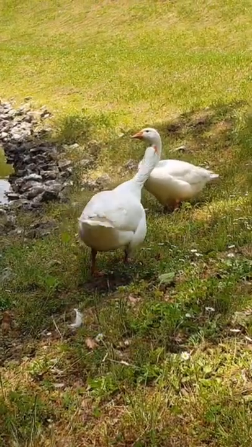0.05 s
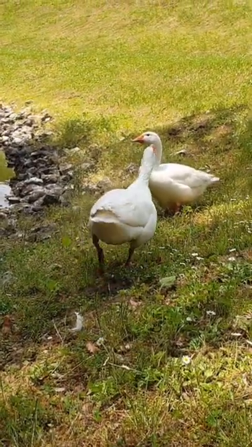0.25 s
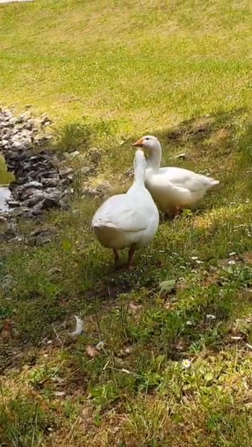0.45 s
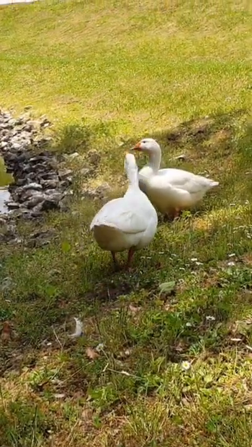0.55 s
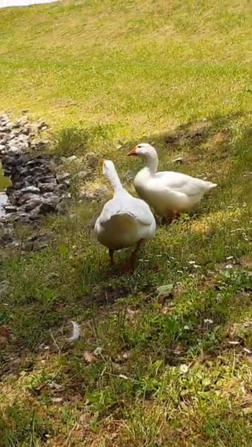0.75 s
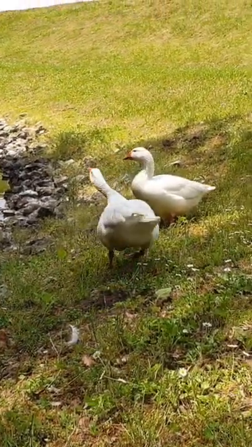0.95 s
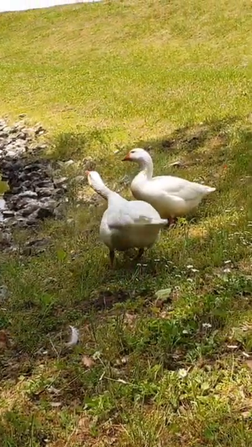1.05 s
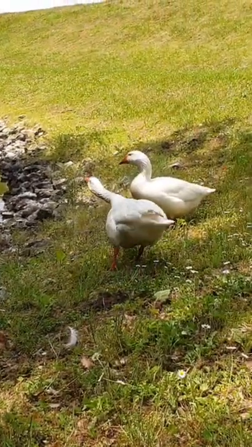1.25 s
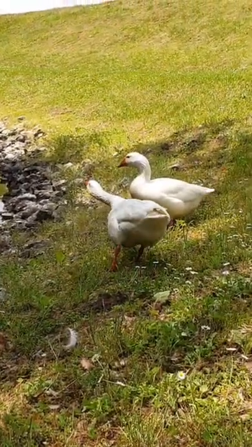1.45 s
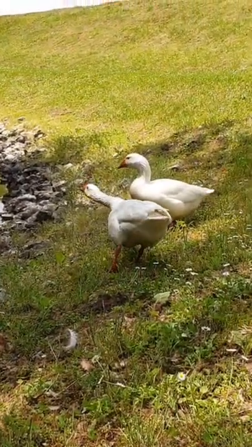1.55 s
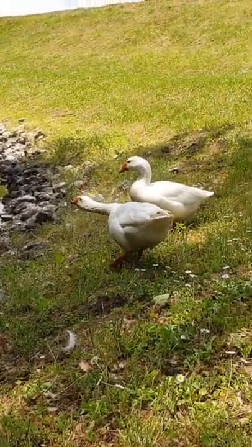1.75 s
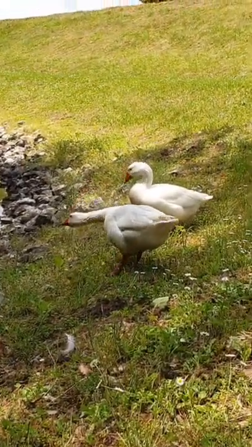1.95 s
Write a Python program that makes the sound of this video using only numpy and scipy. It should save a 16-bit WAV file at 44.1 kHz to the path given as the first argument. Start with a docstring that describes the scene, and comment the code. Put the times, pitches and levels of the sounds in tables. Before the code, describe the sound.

Three long, raspy goose honks and two quiet grunts outdoors over faint wind.

```python
"""A grassy bank, a goose a few metres from a stereo microphone: three long rasping honks, two soft grunts.
Its voice box beats about 160 times a second; each beat sends a short rising squeal up the neck,
with a puff of air. The bank throws back a thin bright tail, at first from a honk that has just ended.
A light wind rumbles on the microphone over a faint distant hiss."""
import sys
import numpy as np
from scipy import signal
from scipy.fft import rfft, irfft
from scipy.io import wavfile
from scipy.ndimage import uniform_filter1d, map_coordinates

SR = 44100
rng = np.random.default_rng(int(sys.argv[2]) if len(sys.argv) > 2 else 0)


def file_out(sig):
    """Save sig as 16-bit WAV at sys.argv[1]."""
    # one column per channel
    cols = np.atleast_2d(sig).T
    # limit, then scale
    lim = np.clip(cols, -1, 1)
    pcm = np.round(lim * 32767).astype(np.int16)
    wavfile.write(sys.argv[1], SR, pcm)


N = 88200

# One list per call. Each row: time in seconds, squeal and beat tone levels in dB, squeal pitch in Hz,
# its rise from 0 to 1, then overtones, hiss and windpipe in dB against the squeal.
CALLS = [
    [(0.208, -36, -57, 1178, 0, 4.5, -9, -13), (0.226, -17.5, -34.5, 1366, 0.5, -3, -19, -29),
     (0.242, -15, -34, 1465, 0.21, -11.5, -35, -26.5), (0.29, -24, -34.5, 1110, 0.68, -1, -14.5, -13.5),
     (0.328, -23, -39, 1200, 0.68, -3.5, -25, -17), (0.352, -15.5, -32, 1490, 0.22, -9, -27, -27),
     (0.482, -17, -33, 1355, 0.3, -7.5, -30, -23), (0.497, -15.5, -31.5, 1480, 0.3, -8, -27.5, -21.5),
     (0.568, -15, -33.5, 1387, 0.17, -9, -33.5, -22.5), (0.584, -62, -43, 1290, 0, -16, -35, 8)],
    [(0.806, -40, -55, 1010, 0.56, -9.5, -50, -10.5), (0.839, -30.5, -45, 950, 0.7, -20, -48, -11.5),
     (0.853, -51, -57, 1010, 0.67, -16, -43, 13)],
    [(0.861, -44, -52, 1190, 1, -18, -14, -6), (0.877, -19, -35, 1333, 0.31, -7.5, -26.5, -20),
     (0.953, -21, -37, 1333, 0.36, -11.5, -30, -24.5), (0.995, -17, -29.5, 1485, 0.39, -10, -25.5, -17),
     (1.043, -16.5, -30.5, 1478, 0.31, -11.5, -29, -22.5),
     (1.157, -16.5, -32.5, 1534, 0.57, -10.5, -19.5, -20.5),
     (1.191, -15, -28.5, 1580, 0.44, -9.5, -27.5, -20), (1.249, -17, -33.5, 1437, 0.34, -11, -35, -23),
     (1.268, -27, -51.5, 1450, 0.17, 2, -16.5, 0)],
    [(1.298, -44, -44, 1070, 1, 11.5, -3, -4), (1.32, -28.5, -46, 1090, 0, -14.5, -35, -9),
     (1.35, -31, -40.5, 1030, 0.73, -5, -26, -6), (1.386, -39, -40, 1120, 0, -7, -38, -5),
     (1.396, -60, -67, 1030, 0.7, -6, -18, 18)],
    [(1.442, -62, -67, 1330, 0.6, -15, -38, -3), (1.45, -28, -50, 1260, 0.38, 1, -23, -14),
     (1.472, -17, -30.5, 1485, 0.34, -12, -30.5, -19.5), (1.522, -23, -49, 1297, 0.22, -10.5, -28, -10.5),
     (1.545, -32, -29.5, 1236, 0.66, 1.5, -4.5, -11.5), (1.586, -19, -40.5, 1320, 0.23, -7, -17, -17),
     (1.662, -21, -32, 1538, 0.3, -10, -25.5, -13.5), (1.696, -16.5, -36, 1292, 0.18, -6, -40, -18),
     (1.708, -31.5, -39, 1214, 0, -1, -30, -14), (1.72, -53, -65, 1190, 1, 15, -26, 8)],
]
# The rasp. Each row: time in seconds, roughness and strong-weak alternation of beats, both 0 to 1.
RASP = [(.2, .6, 0), (.25, .45, .2), (.36, .13, .4), (.46, .2, .35), (.5, .08, 0), (.58, .12, 0),
        (.8, .15, 0), (.86, .3, 0), (.95, .55, .2), (1.0, .3, .1), (1.06, .17, .08), (1.27, .2, .05),
        (1.4, .12, 0), (1.44, .55, 0), (1.5, .45, .2), (1.55, .9, 0), (1.58, .1, 0), (1.66, .1, 0),
        (1.72, .35, .2)]
# The voice box. Each row: time in seconds, beat rate in Hz.
BEAT_RATE = [(.2, 160), (.25, 157), (.5, 158.7), (.555, 158), (.584, 148), (.8, 140), (.855, 141),
             (.87, 158), (1.05, 158.2), (1.12, 159.5), (1.2, 162.7), (1.25, 162), (1.27, 156), (1.3, 154),
             (1.39, 146), (1.44, 160), (1.56, 155), (1.59, 159), (1.68, 162.5), (1.698, 161), (1.72, 151)]
# Resonances of the bird and its breath. Each row: centre in Hz, width in Hz, relative level in dB.
NECK_MODES = [(978, 175, 16.5), (1329, 137, 6.5), (1736, 200, 6.5)]
THROAT_MODES = [(2065, 214, 3), (2450, 170, 5), (2827, 143, 8), (2990, 180, 2.5), (3405, 64, 8),
                (3900, 720, 0.5), (4660, 1550, -2.5)]
WINDPIPE_MODES = [(554, 92, -4), (273, 67, -9), (663.5, 390, -10.5)]
HISS_BANDS = [(6600, 2060, -3), (9340, 1700, -16)]
SHEEN_BANDS = [(10400, 4800, 1.7), (13050, 1200, -2.2)]
# Ticks at the edges of honks. Each row: time in seconds, level in dB.
TICKS = [(0.209, -3.5), (0.2165, -27), (.221, -29), (0.865, -7), (1.262, -17.5), (1.445, -11)]
# Brief tones in the voice: short whistles, and the second grunt's fifth harmonic.
# Each row: start and length in seconds, pitch and glide in Hz, level between beats in dB.
BRIEF_TONES = [(0.355, 0.1, 3097, -13, -29.5), (0.864, 0.15, 526.4, -20, -39.5),
               (0.968, 0.056, 505, 35, -33), (1.084, 0.034, 521, -24, -35), (1.089, 0.13, 2750, -8, -31),
               (1.124, 0.037, 4440, -8, -28.5), (1.141, 0.091, 740, -11, -35),
               (1.193, 0.071, 3007, -51, -28.5), (1.306, 0.075, 766, -36, -36.5)]
# Distant hiss. Each row: frequency in Hz, relative level in dB.
AIR_SPECTRUM = [(30, -81), (116, -9), (176, -13), (1140, -18), (1410, -11), (1920, -14.5),
                (8690, -32), (13200, -36)]
# Wind on the microphone. Each row: time in seconds, level before gusts in dB.
WIND_LEVEL = [(0.0, -73.5), (0.61, -54), (0.65, -64), (0.919, -74), (1.05, -74), (1.11, -55.5), (2.0, -72)]
# Colour of the bank's echo. Each row: band centre in Hz, weight in dB.
ECHO_BANDS = [(750, -15), (1700, -27), (3000, -7), (7000, -2), (12000, 2)]
# Its decay. Each row: band centre in Hz, seconds to fall 60 dB.
ECHO_DECAY = [(750, 0.36), (1700, 0.4), (3000, 0.49), (7000, 0.42), (12000, 0.33)]
# Balance of the microphone's two ports. Each row: frequency in Hz, left minus right in dB.
PORT_BALANCE = [(110, 0.5), (200, -1.5), (700, 0.5), (1290, 1.5), (2380, 4), (4400, -7), (8120, 7),
                (15000, 1.5)]
# Phase between them. Each row: frequency in Hz, lead of the left port in radians.
PORT_LEAD = [(0, 0), (700, .35), (1290, .8), (1550, 1.6), (1810, .7), (2070, 4.9), (3100, 6.9), (7400, 10),
             (15000, 12)]


def undb(db):
    return 10 ** (np.asarray(db) / 20)


def unit(x):
    return x / np.sqrt(np.mean(x ** 2))


def band(x, hz, width):
    """A resonance applied twice."""
    b, a = signal.iirpeak(hz, hz / width, fs=SR)
    return signal.lfilter(b, a, signal.lfilter(b, a, x))


def cut(x, hz, kind):
    return signal.sosfilt(signal.butter(4, hz, kind, fs=SR, output="sos"), x)


def drift(rate_hz):
    """A smooth random wander, RMS 1."""
    span = int(SR / rate_hz)
    return unit(uniform_filter1d(uniform_filter1d(rng.standard_normal(N), span), span))


def resonate(x, modes, wander_db=2.0):
    """Sum of resonances, each swelling and fading on its own; RMS 1."""
    return unit(sum(undb(db + wander_db * drift(55)) * band(x, hz, width) for hz, width, db in modes))


def colour(x, gain):
    """Multiply the spectrum by gain(Hz)."""
    n = x.shape[-1]
    hz = np.maximum(np.arange(n // 2 + 1) * SR / n, 1)
    return irfft(rfft(x) * gain(hz), n)


def curve(table, at):
    return np.interp(at, *np.array(table).T)


def log_curve(table, hz):
    points_hz, values = np.array(table).T
    return np.interp(np.log(hz), np.log(points_hz), values)


def distant_air(level_db=-60):
    """Faint steady hiss from far off, unrelated left and right."""
    hiss = colour(rng.standard_normal((2, N)), lambda hz: undb(log_curve(AIR_SPECTRUM, hz)))
    return unit(hiss) * undb(level_db)


def wind(t, shared=0.45, gust_db=2.5):
    """Gusts rumble on the microphone, partly alike at both ports."""
    noise = rng.standard_normal((3, N))
    rumble = band(shared * noise[0] + (1 - shared) * noise[1:], hz=50, width=25)
    return unit(rumble) * undb(curve(WIND_LEVEL, t) + gust_db * drift(33))


def bank_echo(voice, earlier_s=0.57, earlier_db=-8, waver_s=0.000596, onset_s=0.0014):
    """The bank scatters the voice back as diffuse echoes, each band fading at its own rate."""
    shift = int(earlier_s * SR)
    # The first honk also sounds just before the start; only its tail is heard.
    calls = np.concatenate([undb(earlier_db) * voice[:shift], voice])
    # Moving air makes the echoes arrive unevenly.
    waver = waver_s * SR * np.concatenate([drift(40)[:shift], drift(40)])
    calls = map_coordinates(calls, [np.arange(len(calls)) + waver], order=3)
    age = np.arange(SR) / SR
    response = 0
    for (hz, db), (_, t60) in zip(ECHO_BANDS, ECHO_DECAY):
        scatter = band(rng.standard_normal((2, SR)), hz, hz)
        response += undb(db) * scatter * np.exp(-np.log(1000) * age / t60) / np.sqrt(t60 * hz)
    response *= np.clip(age / onset_s, 0, 1)
    return signal.fftconvolve(calls[None], response, axes=1)[:, shift:shift + N]


def goose(t, neck_db=-4.5, rumble_db=-15.5, puff_depth=0.7):
    """Each beat of the voice box sends a rising squeal up the neck, with a knock and a puff of air."""
    times, *columns = np.array(sorted(row for call in CALLS for row in call)).T
    db, tone_db, squeal_hz, rise, over_db, hiss_db, pipe_db = (np.interp(t, times, c) for c in columns)
    calling = sum((t > call[0][0]) & (t < call[-1][0]) for call in CALLS) > 0
    calling = uniform_filter1d(calling.astype(float), size=60)
    rasp_times, *rasp = np.array(RASP).T
    rough, alternation = (np.interp(t, rasp_times, c) for c in rasp)

    beat_hz = curve(BEAT_RATE, t)
    cycles = np.cumsum(beat_hz) / SR
    beat, within = cycles.astype(int), cycles % 1
    seesaw = alternation * (-1) ** beat
    # Roughness makes every beat a little different.
    time_jitter, size_jitter, pitch_jitter, phase_jitter = rough * rng.standard_normal((N // 100, 4))[beat].T
    from_peak = within - 0.45 - 0.061 * time_jitter  # in beats
    width = 0.19 * (1.6 - rise + 0.5 * rough)  # a squeal that rises less lasts longer
    pulse = np.exp(-0.5 * (from_peak / width) ** 2) * np.sin(np.pi * within) ** 0.5
    strength = undb(4 * size_jitter)
    beat_start = np.searchsorted(cycles, beat)  # each squeal takes its base pitch as the beat begins
    turns_per_beat = (squeal_hz / beat_hz)[beat_start] * (1 + 0.08 * pitch_jitter)
    turns = turns_per_beat * (from_peak + rise * from_peak ** 2)
    phase = 2 * np.pi * turns + 1.6 * phase_jitter + np.pi / 2 * seesaw

    bare = unit(cut(pulse * strength * np.cos(phase), 870, "high"))
    squeal = unit(bare + undb(neck_db) * resonate(bare, NECK_MODES))
    puff = 1 - puff_depth + puff_depth * pulse * strength
    buzz = pulse ** 2 * strength * (np.cos(2 * phase) + 1.2 * np.cos(3 * phase))
    overtones = undb(over_db) * throat(squeal, buzz, np.sqrt(rough) * puff)
    knocks = undb(pipe_db) * windpipe(beat, strength * (1 + 2 * seesaw), rough)
    hiss = undb(hiss_db) * breath(puff, calling)
    rumble = unit(band(rng.standard_normal(N), hz=160, width=130))
    beat_tone = np.sqrt(2) * np.sin(2 * np.pi * cycles) + undb(rumble_db) * rumble
    honks = undb(db) * (squeal + overtones + knocks + hiss) + undb(tone_db) * beat_tone
    return calling * (honks + ticks(t) + brief_tones(t, pulse))


def throat(squeal, buzz, rough_puff, noise_db=2, buzz_db=-7):
    """The clipped squeal and rough air ring the throat; the squeal's own overtones add a crisp buzz."""
    clipped = np.tanh(3 * squeal)
    noise = undb(noise_db) * rough_puff * rng.standard_normal(N)
    ringing = resonate(unit(clipped + clipped ** 2) + noise, THROAT_MODES)
    crisp = unit(band(buzz, hz=3800, width=3800))
    return cut(unit(ringing + undb(buzz_db) * crisp), 9000, "low")


def windpipe(beat, strength, rough):
    """Each beat knocks on the windpipe's low resonances; a rough voice adds noise."""
    knocks = np.diff(beat, prepend=0) * strength
    return resonate(unit(knocks) + (0.2 + 2 * rough) * rng.standard_normal(N), WINDPIPE_MODES)


def breath(puff, calling, scatter_db=-2, sheen_db=-4.5, sheen_rise_s=0.18):
    """Puffs of air hiss, part reaching each port on its own; the top of the hiss comes in late."""
    noise = rng.standard_normal((3, N))
    air = puff * (noise[0] + undb(scatter_db) * noise[1:])
    step = 1 / (sheen_rise_s * SR)
    swell = signal.lfilter([step], [1, step - 1], calling)
    hiss = cut(resonate(air, HISS_BANDS), 9000, "low")
    return hiss + undb(sheen_db) * swell ** 2 * resonate(air, SHEEN_BANDS)


def ticks(t, hz=3140, decay_s=0.00072):
    """Bright ticks as a honk begins or breaks off."""
    out = 0
    for start, db in TICKS:
        age = t - start
        envelope = np.clip(age / decay_s, 0, 1) * np.exp(-np.abs(age) / decay_s)
        out += undb(db) * envelope * np.sin(2 * np.pi * hz * age)
    return out


def brief_tones(t, pulse, wobble=0.00797):
    """Short whistles and the second grunt's fifth harmonic, unsteady and pulsing with the beat."""
    out = 0
    for start, length, hz, glide, db in BRIEF_TONES:
        progress = np.clip((t - start) / length, 0, 1)
        pitch = hz + glide * progress + wobble * hz * drift(133)
        out += undb(db) * np.sin(np.pi * progress) * np.sin(2 * np.pi * np.cumsum(pitch) / SR)
    return out * (1 + pulse)


def microphone_ports(voice):
    """The direct voice reaches the two ports at different levels, the left leading in phase."""
    def tilt(hz):
        return undb(log_curve(PORT_BALANCE, hz) / 2)
    left = colour(voice[0], lambda hz: tilt(hz) * np.exp(1j * curve(PORT_LEAD, hz)))
    right = colour(voice[1], lambda hz: 1 / tilt(hz))
    return np.array([left, right])


def scene():
    """The goose a few metres off, the bank's echo, distant air and wind at the microphone."""
    t = np.arange(N) / SR
    voice = goose(t)
    return microphone_ports(voice) + bank_echo(voice[0]) + distant_air() + wind(t)


def record(dry, top_hz=15450):
    """The phone cuts the top of the treble steeply."""
    return signal.sosfilt(signal.ellip(10, 0.2, 80, top_hz, fs=SR, output="sos"), dry)


dry = scene()
out = record(dry)
file_out(out)
```